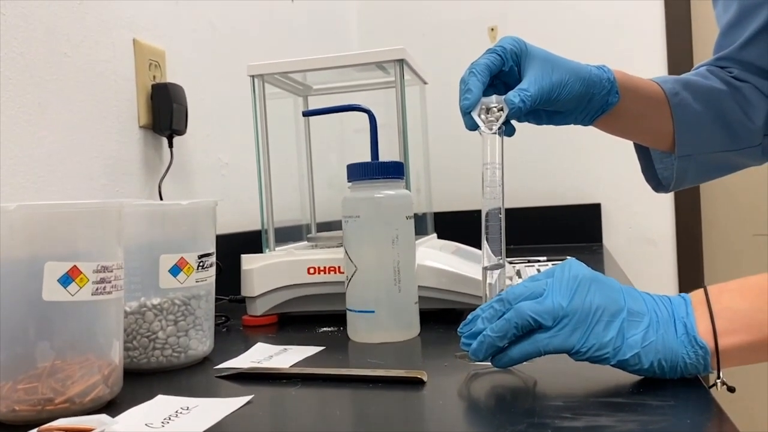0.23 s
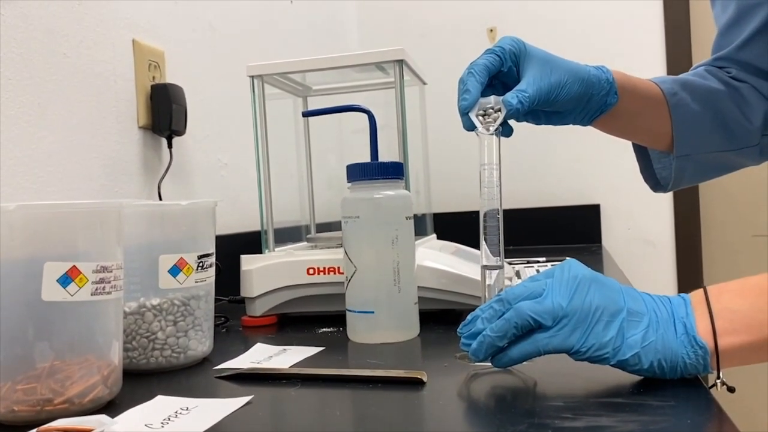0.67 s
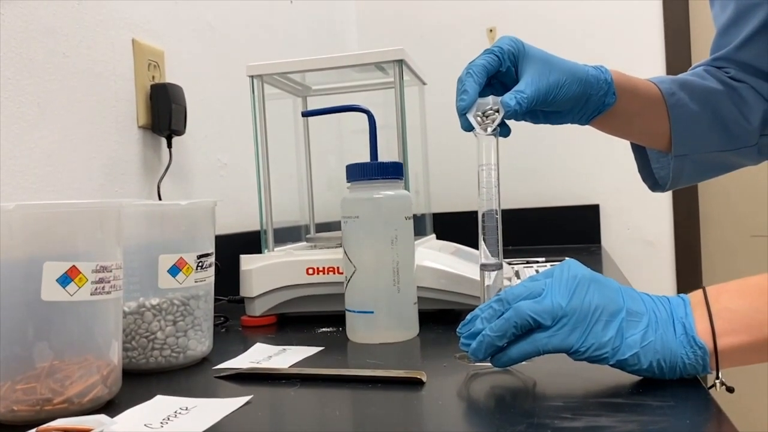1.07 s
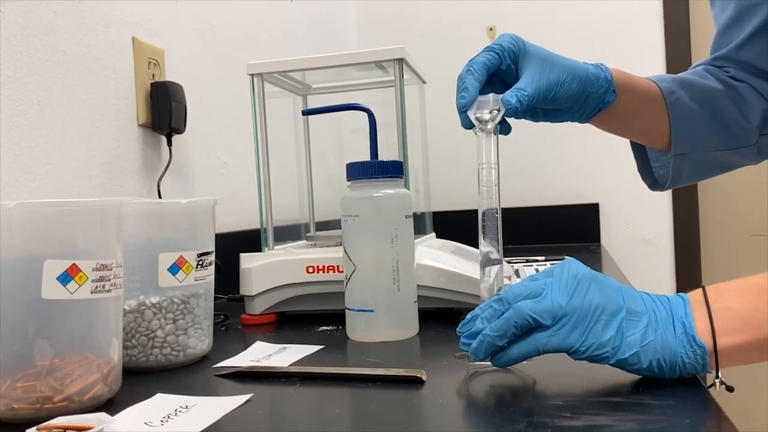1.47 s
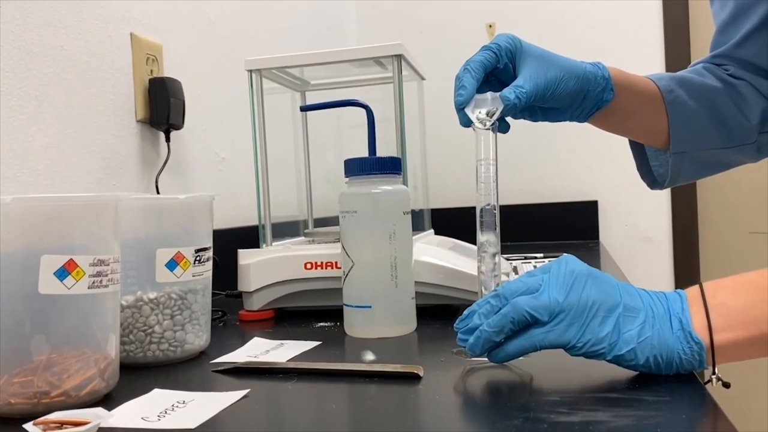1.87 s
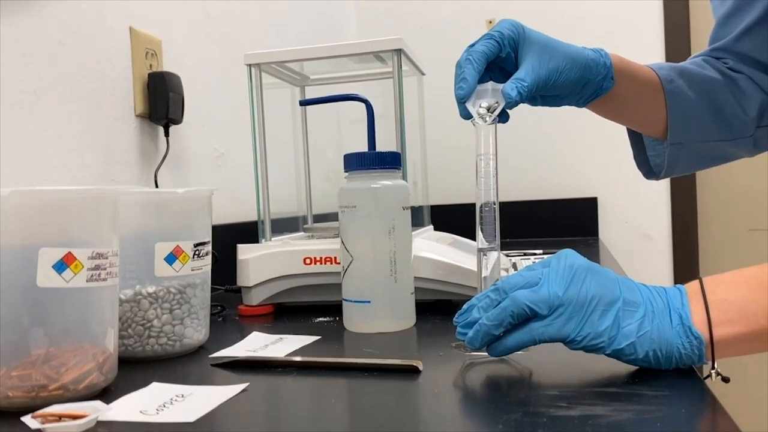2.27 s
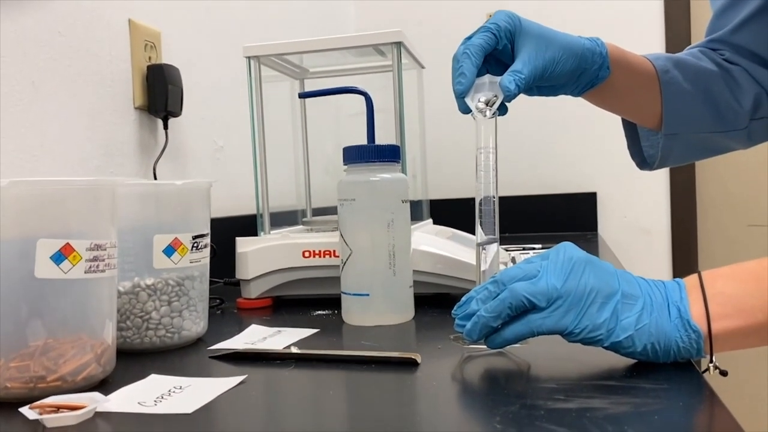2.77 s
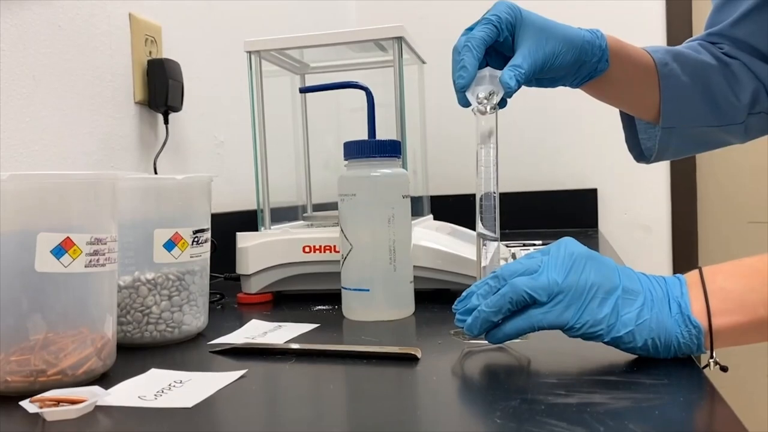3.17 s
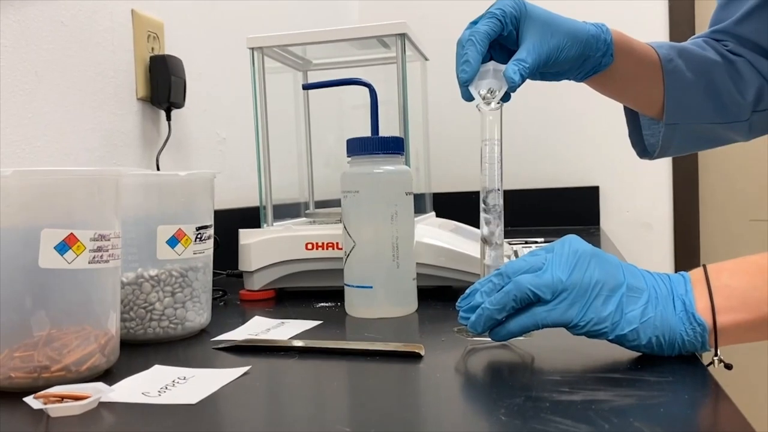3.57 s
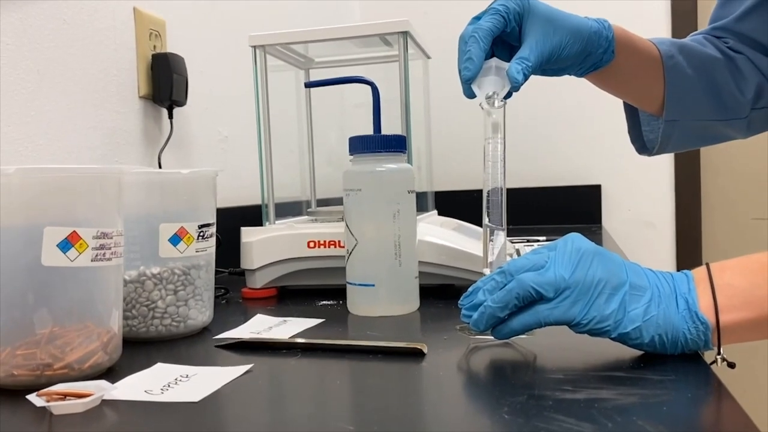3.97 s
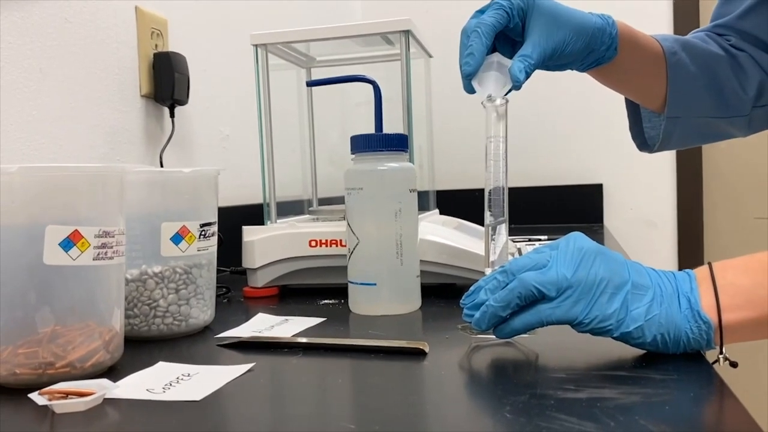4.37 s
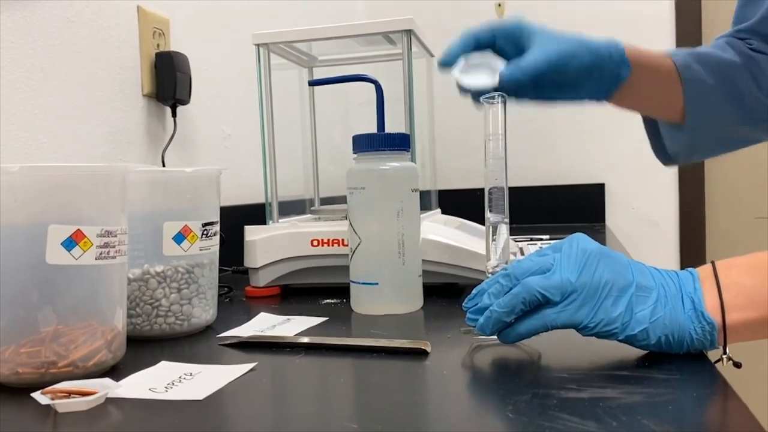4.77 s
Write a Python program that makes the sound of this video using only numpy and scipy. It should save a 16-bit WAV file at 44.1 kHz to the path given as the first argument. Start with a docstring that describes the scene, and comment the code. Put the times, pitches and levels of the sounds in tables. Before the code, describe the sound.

Close stereo view of a lab bench: quiet hum and a few tiny rustles first, then a burst of sharp glassy clinks with watery bubbling as pellets fall into a measuring cylinder. Squeaky scrapes of a plastic dish on the glass rim follow, fading into light ticking rubs. Sparser clinks, knocks and resonant plops come later, then faint glove sounds over the hum.

```python
"""In a small lab with humming ventilation, metal pellets and a glove first rustle against a plastic dish.
A pour then clinks down a hand-damped glass measuring cylinder (damped modes) and plops into its water,
ringing the air column (quarter-wave pipe) and bubbles. The dish scrapes, then rubs the rim (friction noise
driving modes). A second pour follows, with knocks on the rim; at the end soft rustles and rubs remain."""
import sys
import numpy as np
from scipy import signal
from scipy.fft import rfft, irfft
from scipy.io import wavfile

SR = 44100
rng = np.random.default_rng(int(sys.argv[2]) if len(sys.argv) > 2 else 0)


def digitize_waveform(pressure):
    """Quantize a signal to 16-bit integers and store it at the path in sys.argv[1].

    Rows of a 2-D input are taken as channels; values are limited to [-1, 1].
    """
    field = np.atleast_2d(pressure).T
    bounded = np.clip(field, -1, 1)
    quanta = np.round(bounded * 32767).astype(np.int16)
    wavfile.write(sys.argv[1], SR, quanta)


N = 220646  # samples in the scene
T = np.arange(int(.35 * SR)) / SR  # time axis of one event [s]
LEFT_RIGHT = np.array([[1], [-1]])  # opposite signs for the two channels

# Table levels are relative: each layer trims them where it plays them.


def undb(db):
    """Logarithmic level: decibels to amplitude gain."""
    return 10 ** (np.asarray(db) / 20)


def unit(x):
    """Normalisation: scale to rms 1."""
    return x / np.sqrt(np.mean(x ** 2))


def fade(t60):
    """Exponential damping: decay by 60 dB in t60 seconds."""
    return np.exp(-np.log(1000) * T / t60)


def swell(tau):
    """Exponential onset: approach to full level with time constant tau [s]."""
    return 1 - np.exp(-T / tau)


def add(track, s, sound):
    """Superposition: mix a sound into the track at s seconds."""
    i = int(s * SR)
    track[:, i:i + len(T)] += sound[..., :max(N - i, 0)]


def colour(x, points):
    """Spectral shaping: weight a sound by (frequency [Hz], level [dB]) points on a log frequency axis."""
    hz, db = np.transpose(points)
    f = np.fft.rfftfreq(x.shape[-1], 1 / SR) + 1
    gain = undb(np.interp(np.log(f), np.log(hz), db))
    return irfft(rfft(x) * gain, x.shape[-1])


def resonate(x, hz, width):
    """Resonance: one second-order peak, gain 1 at its centre."""
    return signal.lfilter(*signal.iirpeak(hz, hz / width, SR), x)


def resonate_twice(x, hz, width):
    """Cascaded resonance: two equal peaks in series give steeper skirts."""
    return resonate(resonate(x, hz, width), hz, width)


def stereo_noise(count, side):
    """Partial coherence: noise whose two channels differ by the given side weight."""
    a, b = rng.standard_normal((2, count))
    return np.array([a + side * b, a - side * b]) / np.hypot(1, side)


def ring(modes, scatter_db=0., detune=0., spread=0.38):
    """Modal superposition: decaying sines, rms 1 at the start, weighted and tuned anew at each strike."""
    out = 0
    for hz, db, t60 in modes:
        size, pitch, lead = rng.standard_normal(3)
        phase = 2 * np.pi * hz * (1 + detune * pitch) * T + spread * lead * LEFT_RIGHT
        out = out + undb(db + scatter_db * size) * fade(t60) * np.sin(phase)
    onset = out[:, T < .003]
    return out / np.sqrt(np.mean(onset ** 2))


# State of the filling cylinder: (time [s], air column pitch [Hz],
# glass tuning [0 first pour to 1 later], tuning of the pellets' ping [ratio])
FILL = [(1.3, 620, 0.07, 0.97), (1.8, 671, 0, 1.12), (3.15, 720, 0.72, 1), (3.58, 734, 0.67, 1.036),
        (4.15, 802, 0.82, 0.983), (4.55, 808, 0.88, 1.006)]


def air_column(s, third_db=-13, t60=.11):
    """Quarter-wave pipe: the air above the water rings; its third partial dies sooner."""
    hz = np.interp(s, *np.transpose(FILL)[:2])
    return ring([(hz, 0, t60), (3 * hz, third_db, t60 / 3)], detune=.004, spread=.4)


# Glass wall, two pairs and then the top modes: (frequency in the first pour [Hz], in the later pour [Hz],
# level in the first pour [dB], in the later pour [dB], t60 [s])
WALL = [(4957, 4870, 11.5, -1.5, 0.019), (5100, 7100, -16.5, -6.5, 0.016), (7980, 7674, -7, -5, 0.037),
        (8340, 7400, -6, -10.5, 0.017), (12180, 12260, -10, -5, 0.058), (13140, 14000, -4, -2, 0.03),
        (13500, 19000, -8, -0.5, .01), (14400, 10000, 1.5, -5, 0.019), (14900, 14700, -3, -3, 0.015)]
# The pellets' own modes: (frequency [Hz], level [dB], t60 [s])
PING = [(8950, -8, 0.026), (9430, -11.5, 0.014), (10250, -10.5, 0.0028)]
# The second wall pair follows the lowest pair and the ping: offset [dB], slope [dB per dB]
SECOND_DB, SECOND_FOLLOWS = -1, 0.38


def clink(s, low_db, ping_db):
    """Impact excitation: a crack, the damped wall modes, the pellet's ping and a trace of air column."""
    times, _, glass_tuning, ping_tuning = np.transpose(FILL)
    later, ping_ratio = np.interp(s, times, glass_tuning), np.interp(s, times, ping_tuning)
    wall = [(f0 + later * (f1 - f0), a0 + later * (a1 - a0), t60) for f0, f1, a0, a1, t60 in WALL]
    low, second, top = wall[:2], wall[2:4], wall[4:]
    second_db = SECOND_DB + SECOND_FOLLOWS * (low_db + ping_db)
    glass = undb(1.5) * ring(top, scatter_db=3.5, detune=0.013)
    glass += undb(low_db) * ring(low, scatter_db=2.5, detune=0.02)
    glass += undb(second_db) * ring(second, scatter_db=2.0, detune=0.0082)
    pellet_modes = [(hz * ping_ratio, db, t60) for hz, db, t60 in PING]
    ping = undb(ping_db + 1.0) * ring(pellet_modes, scatter_db=4, detune=.02)
    # crack and knock grow with the combined amplitude of all modes
    force = np.linalg.norm(undb([0, low_db, second_db, ping_db]))
    crack = stereo_noise(len(T), 1.0) * (undb(-14.5) * fade(0.018) + undb(-26.5) * fade(0.048))
    knock = undb(-33.0) * air_column(s, third_db=-6.0, t60=0.027)
    return (glass + ping + force * (crack + knock)) * swell(0.00036)


# Pellet strikes: (time [s], top wall modes [dB], then relative to them:
# lowest wall pair [dB], the pellet's own ping [dB])
CLINKS = [(1.3244, -31, -4, -20), (1.3519, -33.5, -0.5, -17), (1.374, -34, -1.5, -24),
          (1.4183, -32, -18, -13), (1.4425, -19, -9, -23), (1.4657, -34, 0.5, -18), (1.5277, -33, 2, 7),
          (1.5461, -20, -1, -8), (1.5763, -25.5, -3.5, -14), (1.583, -20.5, -22, -19),
          (1.6102, -28.5, 1, -9), (1.683, -27.5, -5, 4.5), (1.701, -36, 7, -23),
          (1.7159, -17, -12.5, -16.5), (1.746, -26.5, -2.5, -8.5), (1.7601, -26, -12, -24),
          (1.8428, -24, -24, -23), (1.8595, -25, -13, -19), (1.9056, -29.5, 1.5, -13),
          (3.0794, -32, 1, -15), (3.1006, -39, 8.5, -3), (3.1323, -31.5, 2.5, -8), (3.1587, -29.5, 3, -3),
          (3.177, -31, 8.5, -6), (3.2316, -25.5, -11, -12), (3.3034, -29, -11, -1),
          (3.3059, -25.5, -13, 8.5), (3.3303, -32.5, -18, 5), (3.3899, -42.5, 5.5, 16.5),
          (3.4741, -28, -14.5, -28), (3.531, -30.5, 0.5, -14), (3.5459, -36.5, 1, -11),
          (3.5636, -34, -11, 6.5), (3.577, -33.5, -3.5, 8.5), (3.6676, -43, 0.5, 7),
          (3.9322, -23.5, -0.5, -14), (4.016, -25, -19, -28), (4.054, -31.5, -3.5, -24),
          (4.0758, -37.5, 4.5, -19), (4.1017, -27, -7.5, -15), (4.1091, -31, 0, -11),
          (4.1198, -36.5, -2, 0), (4.248, -46, 8, 9), (4.328, -33, 6, -3), (4.389, -35, 1, -13),
          (4.4053, -29, -5.5, -17), (4.4382, -33.5, -3, -11), (4.5257, -34, -7, -4.5),
          (4.5447, -30.5, -20, 2.5), (4.5552, -39, 2, 2), (4.622, -45.5, 2, 9)]


def pellets(count=2):
    """Repeated impact: each strike is followed by a couple of weak rebounds down the tube."""
    out = np.zeros((2, N))
    for s, db, *shares in CLINKS:
        add(out, s, undb(db + 1.5) * clink(s, *shares))
        for wait, size in rng.random((count, 2)):
            s += 0.0036 + 0.01 * wait
            rebound_shares = shares + 3 * rng.standard_normal(len(shares))
            add(out, s, undb(db - 14.5 - 3.1 * size) * clink(s, *rebound_shares))
    return out


# How busily the pellets move down the tube, one list a pour: (time [s], level [dB])
POURS = [
    [(1.25, -68), (1.5, -52.5), (1.55, -42), (1.68, -48), (1.86, -37), (1.92, -66)],
    [(3.05, -68), (3.09, -44), (3.25, -50), (3.39, -50.5), (3.6, -48.5), (3.78, -65), (4.14, -49),
     (4.5, -67), (4.6, -58), (4.76, -59.5)],
]


def pour():
    """Activity envelope: how busily the pellets move, as a gain over time; zero between the pours."""
    t = np.arange(N) / SR
    gain = 0
    for s, db in map(np.transpose, POURS):
        gain = gain + undb(np.interp(t, s, db)) * (t > s[0]) * (t < s[-1])
    return gain


GRAZES_PER_S, GRAZE_DB, GRAZE_SPREAD_DB = 45, 4, 5.5  # light contacts; level relative to the pour
# Their lowest wall pair, their ping and the spread of both [dB]
GRAZE_LOW_DB, GRAZE_PING_DB, GRAZE_COLOUR_DB = -4.5, -4.5, 4.5


def grazes(count=300):
    """Random impacts: during a pour, pellets graze the wall, each with its own strength and colour."""
    out, busy = np.zeros((2, N)), pour()
    times = (np.arange(count) + rng.random(count)) / GRAZES_PER_S
    for s, (size, low, ping) in zip(times, rng.standard_normal((count, 3))):
        i = int(s * SR)
        if i < N and busy[i] > 0:
            low_db = GRAZE_LOW_DB + GRAZE_COLOUR_DB * np.tanh(low)
            ping_db = GRAZE_PING_DB + GRAZE_COLOUR_DB * np.tanh(ping)
            add(out, s, busy[i] * undb(GRAZE_DB + GRAZE_SPREAD_DB * size) * clink(s, low_db, ping_db))
    return out


# Spectrum of the skidding: (frequency [Hz], level [dB])
SKID_COLOUR = [(500, 7), (720, 6), (1300, -15), (2150, 4.5), (2900, -5), (4200, 1), (6000, 6), (8500, 1.5),
               (11000, 1), (13000, 0.5), (14500, 1.5), (15800, -5)]
# Level relative to the pour, level relative to a strike, decay after a strike
SKID_DB, AFTER_STRIKE_DB, SKID_T60_S = 0, -17, 0.099


def skids(count=40, rate=45):
    """Shot noise: tiny contacts drive resonances through each pour and flare up after every strike."""
    grit = np.zeros((2, N))
    for hz in np.geomspace(600, 15000, num=count):
        strength = undb(4 * np.minimum(rng.exponential(size=N), 4))
        hits = (rng.random(N) < rate / SR) * strength
        pitch, side = 2 * rng.random(2) - 1
        grit += resonate(hits, hz * (1 + .03 * pitch), hz / 14) * (1 + .5 * side * LEFT_RIGHT)
    gain = undb(SKID_DB) * pour()[None]
    for s, db, low_db, ping_db in CLINKS:
        add(gain, s, undb(db + max(low_db, ping_db) + AFTER_STRIKE_DB) * fade(SKID_T60_S))
    return gain * unit(colour(grit, SKID_COLOUR))


def bubble(hz, t60, rise=0.41):
    """Bubble resonance: a damped note that rises as the bubble nears the surface."""
    pitch = hz * (1 + rise * np.minimum(T / t60, 1))
    return np.sin(2 * np.pi * np.cumsum(pitch) / SR) * fade(t60) * swell(0.00031)


# A pellet meets the water: (time [s], air column [dB], spray [dB], spray pitch [Hz])
SPLASHES = [(1.663, -45.5, -45, 1170), (1.755, -39, -39, 1530), (1.794, -40, -27.5, 1344),
            (1.863, -33, -38, 900), (1.94, -33, -36.5, 990), (2.295, -53, -48.5, 1670),
            (3.167, -46, -43, 1503), (3.331, -50, -61, 1990), (3.383, -38, -42, 2270),
            (3.579, -21, -38.5, 1210), (4.155, -29, -46, 990), (4.33, -60, -41.5, 2420),
            (4.539, -32, -65, 1034), (4.618, -53.5, -54, 2280)]
SPRAY_S = 0.028  # the bubbles of one spray start within this time
GULP_DB, GULP_WIDTH_HZ, GULP_T60_S = -8, 320, 0.076  # broad drive of the air column; width of each pass


def splashes(count=30):
    """Water entry: it thumps the air column, slaps the surface and throws a spray of tiny bubbles."""
    out = np.zeros((2, N))
    for s, column_db, spray_db, hz in SPLASHES:
        add(out, s, undb(column_db - 5.5) * air_column(s, third_db=-8, t60=0.11))
        # the churning entry also drives the air column broadly
        pipe_hz = np.interp(s, *np.transpose(FILL)[:2])
        gulp = resonate_twice(stereo_noise(len(T), 0.52), pipe_hz, GULP_WIDTH_HZ)
        add(out, s, undb(column_db + GULP_DB) * unit(gulp) * fade(GULP_T60_S))
        slap = unit(resonate_twice(stereo_noise(len(T), 1.0), hz, 1.5 * hz))
        add(out, s, undb(spray_db - 1.0) * slap * fade(0.07))
        for when, pitch, size, side in rng.random((count, 4)):
            pan = np.array([[.5 + side], [1.5 - 2 * side]])
            drop = bubble(hz * 2 ** (1.7 * (pitch - .5)), 0.0085) * pan
            add(out, s + SPRAY_S * when, undb(spray_db + 1 - 10 * size) * drop)
    return out


# Large bubbles: (time [s], starting pitch [Hz], level [dB], t60 [s])
BUBBLES = [(1.668, 580, -19, 0.041), (4.163, 393, -29, 0.055), (4.167, 530, -19, 0.012),
           (4.554, 966, -34, 0.023), (3.581, 1310, -51, 0.0092), (3.587, 1180, -39, 0.0096)]


def large_bubbles():
    """Bubble resonance: a few larger bubbles sound singly."""
    out = np.zeros((2, N))
    for s, hz, db, t60 in BUBBLES:
        add(out, s, undb(db - 2) * bubble(hz, t60))
    return out


def water():
    """Superposition: splashes and bubbles, a little stronger on the left."""
    return (splashes() + large_bubbles()) * undb(1.5 * LEFT_RIGHT)


def friction(length, tone, grain=.4, release=.02):
    """Stick-slip friction: uneven slips of the given colour, about rms 1 for their length, then a decay."""
    slips = np.exp(grain * np.tanh(rng.standard_normal(len(T))))
    slips = np.repeat(slips, repeats=48)[:len(T)]  # each slip strength holds for 48 samples
    gate = np.minimum(T / 0.00062, 1) * np.exp(-np.log(1000) * np.maximum(T - length, 0) / release)
    return unit(colour(stereo_noise(len(T), 0.71) * slips, tone)) * gate


# Spectrum of the dish on the rim: (frequency [Hz], level [dB])
SCRAPE_COLOUR = [(300, -23.5), (700, -18), (1200, -22), (2200, -21), (4000, -21), (5400, -17), (6500, -9.5),
                 (8200, -15), (9300, -8), (10300, -12), (11400, -2), (12300, -1.5), (13400, 0.5),
                 (15600, -8)]
# Modes of the free rim, which rings on after a scrape: (frequency [Hz], level [dB], t60 [s])
RIM = [(5400, -11, .09), (5670, -15, .22), (6540, -19, .2), (7950, -14, .1), (9135, -13, .14),
       (9980, -7, .15), (10130, -10, .17), (10460, -12, .18), (11000, -10, .18), (11320, -3, .12),
       (12190, 0, .21), (12335, -7, .13), (13950, -11, .2), (15090, -13, .1), (15690, -12, .1)]
RIM_DRIVE_DB, RIM_WIDTH_HZ = 2, 106  # the juddering dish drives the rim's modes, damped by the contact


def scrape(db, length, squeak_db, ring_db):
    """Friction-driven resonance: the dish judders on the rim, squeaks and sets the rim ringing."""
    # a lighter touch reaches less far into the treble
    treble_loss = 0.46 * min(db + 12, 0)
    tone = [(hz, share + treble_loss * np.clip((hz - 10000) / 5000, 0, 1)) for hz, share in SCRAPE_COLOUR]
    rub = friction(length, tone, grain=0.54, release=0.084)
    squeak = undb(squeak_db + 15.5) * resonate(resonate(rub, 10120, 600), 10370, 600)
    driven = undb(RIM_DRIVE_DB) * sum(resonate(rub, hz, RIM_WIDTH_HZ) for hz, _, _ in RIM)
    rim = undb(ring_db + 2.5) * ring(RIM, scatter_db=0.5, spread=0.26) * swell(length / 2)
    return undb(db - 2.5) * (undb(-4.0) * (rub + driven) + squeak + rim)


# The dish slips hard across the rim: (time [s], level [dB], length [s], squeak [dB], rim ring [dB])
SCRAPES = [(1.919, -15.5, 0.034, -21, -17), (1.936, -16.5, 0.03, -18, -17),
           (1.993, -13.5, 0.022, -10.5, -3), (2.022, -19.5, 0.041, -7.5, 5.5)]


def hard_scrapes():
    """Stick-slip friction: hard slips of the dish across the rim."""
    out = np.zeros((2, N))
    for s, db, *touch in SCRAPES:
        add(out, s, scrape(db, *touch))
    return out


# The trembling hand rubs the dish on the rim: (time [s], level [dB])
RUBS = [(2.164, -40), (2.199, -32.5), (2.3, -36.5), (2.384, -38.5), (2.517, -40.5), (2.594, -42),
        (2.69, -43.5), (2.757, -42), (2.839, -44), (2.905, -43), (2.982, -44), (3.043, -44), (3.734, -51),
        (4.817, -59), (4.929, -59)]
RUB_S, RUB_ATTACK_S, RUB_RING_DB = 0.017, 0.0021, -6  # a rub: its length, its swell, the rim's share
SQUEAK_DB, SQUEAK_SLOPE = -17.5, -0.34  # a lighter rub squeaks more: share at 0 dB, slope [dB per dB]


def rubs():
    """Stick-slip friction: light rubs that swell in gently."""
    out = np.zeros((2, N))
    for s, db in RUBS:
        rub = scrape(db, RUB_S, SQUEAK_DB + SQUEAK_SLOPE * db, RUB_RING_DB)
        add(out, s, rub * swell(RUB_ATTACK_S))
    return out


# The edge of the dish knocks the rim: (time [s], level [dB])
KNOCKS = [(3.229, -41), (3.476, -36), (4.008, -44), (4.1, -31), (4.383, -45)]
KNOCK_S, KNOCK_SQUEAK_DB, KNOCK_RING_DB = 0.013, -27, -3


def knocks():
    """Brief contact: short scrapes with little squeak and a strong rim ring."""
    out = np.zeros((2, N))
    for s, db in KNOCKS:
        add(out, s, scrape(db, KNOCK_S, KNOCK_SQUEAK_DB, KNOCK_RING_DB))
    return out


# Pellets and glove shift against the dish: (time [s], level [dB], length [s])
RUSTLES = [(0.074, -70, 0.0079), (0.588, -60.5, 0.028), (0.835, -67.5, 0.016), (0.979, -52, 0.016),
           (1.092, -58.5, 0.017), (1.114, -42, 0.004), (1.247, -47, 0.017), (1.278, -51, 0.043),
           (4.738, -66, 0.054), (4.849, -69, 0.16)]
# Spectrum of a rustle: (frequency [Hz], level [dB])
RUSTLE_COLOUR = [(400, -5), (700, 2.5), (1300, -17), (2600, -14.5), (4300, 0), (6000, -6), (10000, -11),
                 (15500, -22.5)]


def rustles():
    """Granular friction: soft, very uneven shifts against the dish."""
    out = np.zeros((2, N))
    for s, db, length in RUSTLES:
        add(out, s, undb(db - 0.5) * friction(length, RUSTLE_COLOUR, grain=.7, release=0.078))
    return out


# The glove scuffs: (time [s], level [dB], length [s])
SCUFFS = [(0.362, -63, 0.014), (1.231, -57, 0.012), (3.802, -59.5, 0.071), (3.905, -46.5, 0.011),
          (3.958, -54, 0.031), (4.288, -49, 0.034)]
# Spectrum of a scuff: (frequency [Hz], level [dB])
SCUFF_COLOUR = [(2500, -17), (3600, 0), (4250, 3.5), (4900, -12.5), (6500, -25), (10000, -5.5),
                (13000, -51)]


def scuffs():
    """Surface friction: the glove's smoother scuffs swell in softly."""
    out = np.zeros((2, N))
    for s, db, length in SCUFFS:
        scuff = friction(length, SCUFF_COLOUR, grain=0.34, release=0.09)
        add(out, s, undb(db + 0.5) * scuff * swell(0.0069))
    return out


def dish():
    """Superposition: the dish on the rim, its shifting load and the glove."""
    return hard_scrapes() + rubs() + knocks() + rustles() + scuffs()


# Soft swishes: (time [s], level [dB], length [s], first pitch [Hz], last pitch [Hz])
SWISHES = [(1.79, -53, .04, 2200, 1097), (2.278, -60, 0.25, 2320, 1122), (3.318, -48, 0.0466, 1996, 1733),
           (4.801, -59, 0.35, 613, 712)]


def swishes():
    """Amplitude modulation: low-passed noise times a gliding sine is a narrow band that swells and glides."""
    out = np.zeros((2, N))
    for s, db, length, first_hz, last_hz in SWISHES:
        along = np.minimum(T / length, 1)
        hz = first_hz * (last_hz / first_hz) ** along
        lowpass = signal.butter(2, 0.2 * first_hz, fs=SR, output="sos")
        band = unit(signal.sosfilt(lowpass, stereo_noise(len(T), 1.0)))
        carrier = np.sin(2 * np.pi * np.cumsum(hz) / SR)
        envelope = np.sqrt(np.abs(np.sin(np.pi * along)))
        add(out, s, undb(db + 3.5) * band * carrier * envelope)
    return out


# The lab's reverberation: (frequency [Hz], t60 [s], level [dB])
ROOM = [(490, 0.34, -2.5), (1550, 0.22, 0), (4030, 0.27, -9), (7900, 0.32, -10.5), (14100, 0.13, -9)]


def lab(x):
    """Reverberation: bench and near walls answer within milliseconds; the top treble dies first."""
    hz, t60, db = np.transpose(ROOM)
    edges = np.geomspace(SR / 256, SR / 2.5, num=9)
    tail = 0
    for lo, hi in zip(edges, edges[1:]):
        bandpass = signal.butter(3, [lo, hi], "band", fs=SR, output="sos")
        band = signal.sosfilt(bandpass, stereo_noise(len(T), 1.0))
        centre = np.sqrt(lo * hi)
        decay = fade(np.interp(centre, hz, t60)) * swell(0.001)
        tail = tail + undb(np.interp(centre, hz, db)) * band * decay / np.linalg.norm(decay)
    return x + signal.fftconvolve(x, tail, axes=1)[:, :N]


# Spectrum of the duct rumble: (frequency [Hz], level [dB])
VENT_COLOUR = [(15, -54), (25, -27.5), (32, -11), (42, -5), (64, -5.5), (145, -12.5), (190, -19.5),
               (270, -26), (531, -36.5), (1000, -54.5), (2200, -57.5), (3400, -64.5), (4200, -60),
               (6000, -65), (16000, -80)]
# Ventilation drone: (frequency [Hz], nominal width [Hz], level [dB])
DRONE = [(73.93, 4.6, -47.5), (110.2, 10.7, -50), (150.6, 9.4, -51), (240, 13, -63.5)]


def ventilation():
    """Broadband flow noise: duct rumble, alike in both ears at the bottom, and wavering drone bands."""
    mid, side = (colour(rng.standard_normal(N), VENT_COLOUR) for _ in range(2))
    highpass = signal.butter(1, 260, "high", fs=SR, output="sos")
    side = signal.sosfilt(highpass, unit(side))
    out = undb(-44.5) * (unit(mid) + side * LEFT_RIGHT)
    for hz, width, db in DRONE:
        out += undb(db) * unit(resonate_twice(stereo_noise(N, 0.32), hz, 2 * width))
    return out


def scene():
    """Superposition: pellets, dish and water reverberate in the lab; the ventilation hums beneath."""
    return lab(pellets() + grazes() + skids() + dish() + water() + swishes()) + ventilation()


# Phase by which the left microphone port leads the right: (frequency [Hz], lead [rad])
PORTS = [(0, 0), (2000, 2.5), (3300, 0.92), (4500, .5), (5500, -0.13), (6300, 3.5), (7400, 0.6),
         (8400, 2.5), (10700, 0.5), (11500, -1), (13400, -3), (15500, -5)]
TOP_HZ = 15750  # edge of the low-pass


def record(dry):
    """Interchannel phase: two microphone ports hear the treble out of step; a low-pass cuts the top."""
    lead = np.interp(np.fft.rfftfreq(N, 1 / SR), *np.transpose(PORTS))
    ports = irfft(rfft(dry) * np.exp(.5j * lead * LEFT_RIGHT), N)
    return signal.sosfilt(signal.ellip(8, .2, 70, TOP_HZ, fs=SR, output="sos"), ports)


dry = scene()
out = record(dry)
digitize_waveform(out)
```